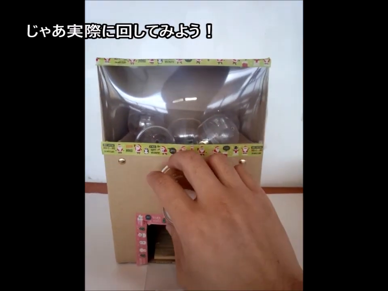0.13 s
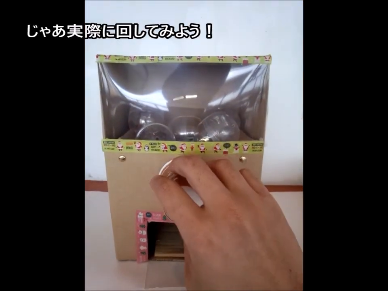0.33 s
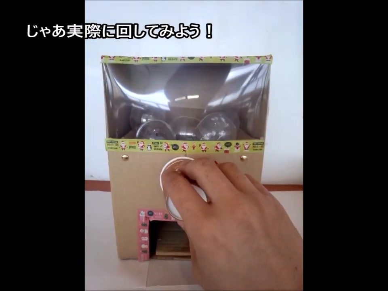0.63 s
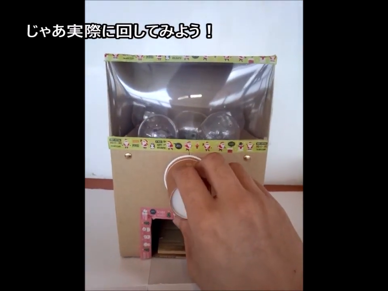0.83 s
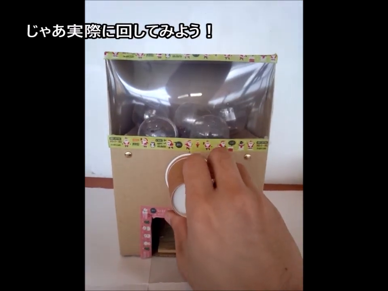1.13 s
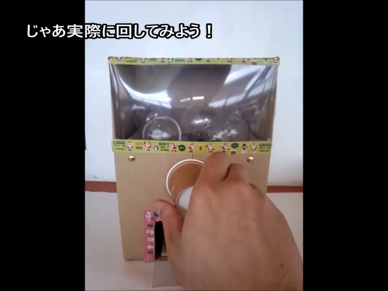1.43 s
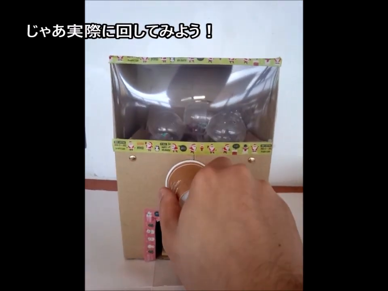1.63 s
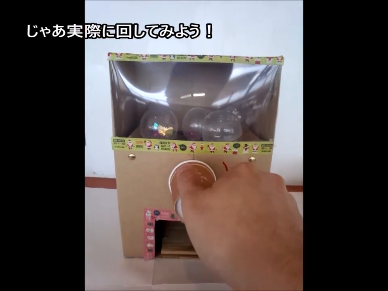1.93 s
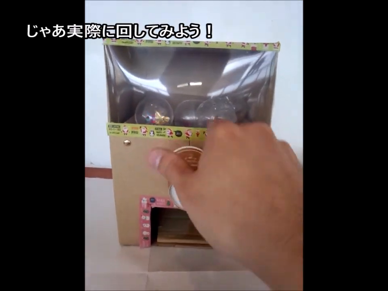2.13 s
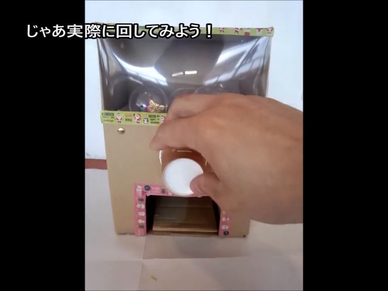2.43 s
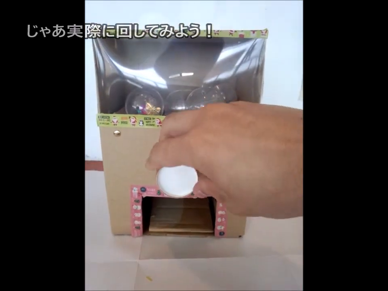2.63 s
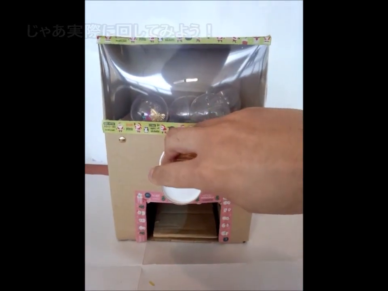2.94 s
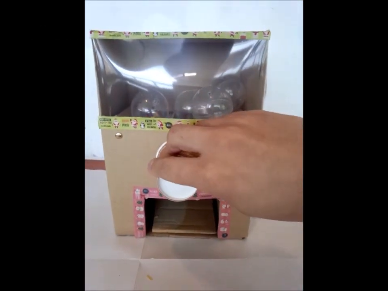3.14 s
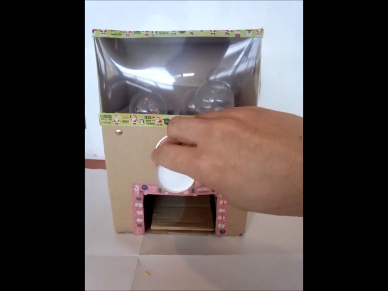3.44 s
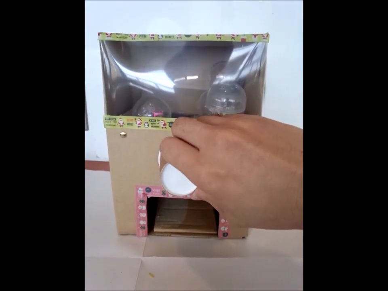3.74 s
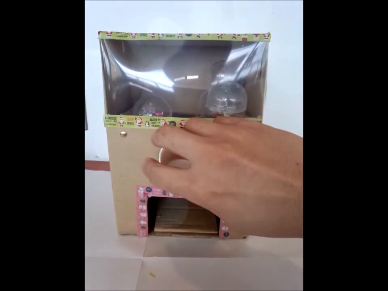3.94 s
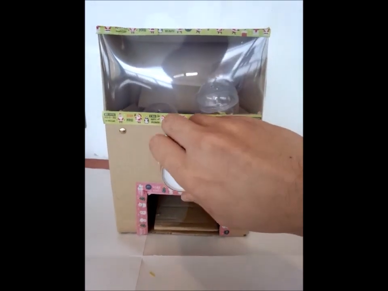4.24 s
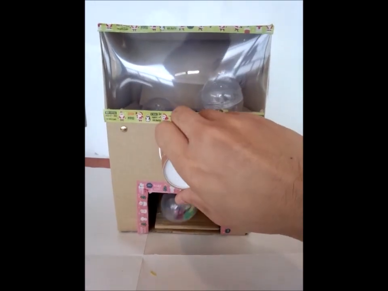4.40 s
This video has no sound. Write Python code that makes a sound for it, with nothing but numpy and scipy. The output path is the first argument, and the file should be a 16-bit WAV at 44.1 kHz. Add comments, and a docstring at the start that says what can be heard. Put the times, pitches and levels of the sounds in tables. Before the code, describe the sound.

Close phone recording in a small room. Over low rumble and soft hiss, a few light ticks and a dull knock lead into a dense burst of cardboard scraping and hollow capsule knocks around two seconds. It thins to near quiet, a light rattle of ticks follows, then another short scrape ends with a capsule dropping in a hard, bright plastic clack.

```python
"""In a small room, close to a phone, a hand turns the knob of a home-made cardboard capsule machine.
Stick-slip friction, modelled as random releases over hiss, makes the drum scrape and the capsules skid.
Impacts excite decaying modes: hollow plastic capsules knock on the cardboard walls and tick together.
At the end one capsule drops down the chute with a hard tick whose close modes beat as they fade.
A short tail of reflections and a low room tone surround the machine."""
import sys
import numpy as np
from scipy import signal
from scipy.fft import rfft, irfft
from scipy.io import wavfile

SR = 44100
rng = np.random.default_rng(int(sys.argv[2]) if len(sys.argv) > 2 else 0)


def output_pcm(signal):
    """Save a mono or channel-first signal as 16-bit PCM at the path in sys.argv[1].

    Samples are clipped to [-1, 1] before scaling.
    """
    pcm = np.clip(np.atleast_2d(signal).T, -1, 1) * 32767
    wavfile.write(sys.argv[1], SR, np.round(pcm).astype(np.int16))


N = 201492

# steady background spectrum of the room: [frequency_hz, level_db]
ROOM_SPECTRUM = [(15, -10), (40, -1), (65, -3), (110, -3), (170, -12), (300, -16), (480, -22), (630, -21),
                 (1000, -26), (1500, -26), (2450, -21), (3500, -29), (5500, -37), (7500, -41), (8300, -52)]
# spectrum of the reflected tail: [frequency_hz, level_db]
TAIL_SPECTRUM = [(100, -18), (400, -7.5), (900, -19), (1500, -8.5),
                 (2400, -8), (3400, -4.5), (4500, 0), (8000, -6)]
# pushes on the knob, by moment of most effort and time constant of the swell:
# [peak_s, swell_s, cardboard_rub_db, plastic_skid_db]
PUSHES = [(.8, 0.13, -55.5, -68), (1.499, .3, -47.5, -56.5), (1.83, .09, -37.5, -40), (2.02, .19, -37, -43),
          (2.36, .08, -63.5, -49), (2.901, 0.48, -63, -52), (3.69, .12, -44, -53), (3.9, .16, -54.5, -53.5),
          (4.269, .08, -41, -46), (4.52, .1, -44, -60)]
# friction spectrum of the drum on cardboard: [frequency_hz, level_db]
RUB_SPECTRUM = [(150, -16), (320, -3.5), (480, -9), (580, 1.5), (635, 4), (700, -1.5), (1000, -13),
                (1450, -7), (1850, -11.5), (2500, -5), (3300, -28.5), (5000, -37.5)]
# friction spectrum of capsule on capsule: [frequency_hz, level_db]
SKID_SPECTRUM = [(2000, 2), (3300, 13), (4000, 11), (4480, 2), (5000, 5.5), (5800, -3.5), (7200, 4),
                 (8200, -54)]
# low rumble of the rocking box: [frequency_hz, level_db]
ROCKING_SPECTRUM = [(25, -16), (55, -7.5), (120, -8), (220, -19), (600, -74)]
# hard plastic ticking on a shell, at the end the fallen capsule's clack and its beating ring:
# [start_s, level_db, top_end_db, dry_crack_db]
TICKS = [(1.1689, -31, -10.5, 7), (1.2116, -30.5, -25, 2), (1.4381, -31, -22, 4), (1.814, -31, -4.5, 0.5),
         (1.9669, -24.5, -13, -11), (2.025, -34, -6.5, 8), (2.3267, -23.5, -30, 5), (3.6567, -28, -28, -3),
         (3.693, -29, -26, -10), (3.7215, -32, -25, -12), (3.763, -29, -19, -4), (3.832, -31.5, -41, 17),
         (3.9494, -31.5, -17, 3), (4.0396, -31, -11.5, 14), (4.434, -20, -11, -2), (4.447, -8.5, -14.5, -6),
         (4.4511, -11.5, -12, 1), (4.4587, -19, -24, -3), (4.478, -23.5, -16, -13),
         (4.4899, -22.5, -11, -2), (4.4941, -17.5, -8, -13), (4.508, -34, -9, 4), (4.521, -31.5, 5.5, -10),
         (4.5439, -22.5, -8, 13)]
# modes of a capsule shell, before the contact envelope: [frequency_hz, level_db, t60_s]
SHELL_MODES = [(2786, -12, .04), (3250, -9, .05), (3800, -13, .05), (4032, -7, .1), (4410, 0, .16),
               (4475, -4, .12), (4553, -2, .12), (4623, -3, .1), (5113, -6, .1), (5358, -5, .14),
               (5520, -9, .06), (6610, -9, .05), (6850, -8, .06), (7100, -7, .05), (7680, -8, .04)]
# capsules knocking on the box, with the note of the wall and the hollow note:
# [start_s, level_db, brightness_db, hollowness_db, wall_hz, hollow_hz]
KNOCKS = [(0.76, -45, -8, 7, 362, 1430), (0.864, -38.5, 0.5, 7.5, 505, 1420),
          (1.152, -15.5, -4, 4, 640, 1316), (1.299, -35, -3, 8.5, 290, 1366),
          (1.471, -31, -4, 2, 617, 1456), (1.593, -31.5, -2.5, 1, 384, 1320),
          (1.655, -27.5, -6, 4.5, 640, 1526), (1.677, -17.5, -4.5, -3, 347, 1410),
          (1.757, -11.5, 1.5, 3, 306, 1292), (1.767, -13.5, 3, 0, 787, 1550),
          (1.791, -26, 0, 4.5, 284, 1480), (1.81, -19, 1, -2, 790, 1460),
          (1.823, -21.5, 0, -3.5, 305, 1490), (1.897, -34.5, 2.5, 11.5, 386, 1500),
          (1.934, -16.5, -2.5, 8.5, 555, 1474), (1.962, -20, -2.5, -6, 760, 1450),
          (1.976, -24, -4, 5, 594, 1514), (2.014, -21.5, -3, 0, 640, 1384), (2.061, -36, -1, 3, 297, 1530),
          (2.181, -21, 5.5, -7.5, 277, 1480), (2.183, -20.5, -0.5, 2.5, 337, 1215),
          (2.628, -44, 13.5, 5.5, 288, 1780), (2.683, -39.5, 8, -5, 295, 1580),
          (3.279, -34.5, -5, -4, 446, 1440), (4.209, -33, 3, 5.5, 672, 1490),
          (4.255, -30.5, -2.5, 4, 407, 1520), (4.277, -23.5, 0, 4, 760, 1670),
          (4.357, -41, 4, 8, 281, 1520), (4.371, -33.5, -3.5, 3.5, 270, 1446),
          (4.426, -23.5, -4, 1.5, 403, 1417), (4.44, -20, -5, -5, 490, 1605),
          (4.486, -33, -2.5, -5, 480, 1230), (4.53, -35, -2, 3, 590, 1430)]
# modes of the box with its capsules, before the contact envelope: [frequency_hz, level_db, t60_s]
BOX_MODES = [(179, -19.5, 0.15), (324.7, 3, 0.032), (457, 3, 0.026), (592, -5.5, 0.14), (700, -25.5, 0.038),
             (770, 0, 0.04), (1241, -2.5, 0.08), (1439, -2.5, 0.049), (1678, -2, 0.013),
             (2200, -17.5, 0.024), (2155, -6, 0.023), (2380, -7, 0.023), (2546, -5, 0.021),
             (2760, 3, 0.0096), (3404, -23.5, 0.14), (3810, -10, 0.027), (4980, -22, 0.025),
             (6150, -15.5, 0.026), (7300, -14.5, 0.022)]
# spectrum of the crunch of creased board: [frequency_hz, level_db]
CRUNCH_SPECTRUM = [(100, 15), (300, -3), (750, 14), (1020, -0.5), (1400, 18), (1850, -5.5), (2600, 1.5),
                   (3300, -11.5), (4800, -8.5), (8000, -26)]
# limits of the thud, hollow, clack and crack registers of a knock: [edge_hz]
REGISTER_EDGES_HZ = [90, 1000, 1900, 3250, 9000]

T = np.arange(N) / SR
RING_T = T[:SR // 6]  # time axis of every short sound
ROOM_DB, ROOM_T60_S = -41.5, 0.32
RELEASE_SHARE = 0.65  # a push dies away in this share of its swell time
# small knocks over the rub, small ticks over the skid, and the scatter of both
JOSTLE_DB, CHATTER_DB, STIR_SPREAD_DB = 3.5, 4, 1.5
NOTE_DB = 8.5  # strength of a knock's two notes over the other modes
CRACK_DB, CRACK_PER_BRIGHTNESS = -14, 0.11  # top register, and how far it follows the brightness
# how long a capsule presses on the board; this much more brightness halves it
CONTACT_S, CONTACT_HALVING_DB = 0.013, 8
TOP_HZ = 8050  # upper limit of the phone's input


def undb(db):
    """Level and amplitude: 20 dB is a factor of ten in gain."""
    return 10 ** (np.asarray(db) / 20)


def unit(x):
    """Mean power: scale to rms 1."""
    return x / np.sqrt(np.mean(x ** 2))


def blow(x):
    """Impact energy: scale a short sound to the energy of 5 ms at rms 1."""
    return x / np.sqrt(np.sum(x ** 2) / (SR / 200))


def fade(t60):
    """Exponential damping: a fall of 60 dB in t60 seconds."""
    return np.exp(-np.log(1000) * RING_T / max(t60, 1e-3))


def band(x, low_hz, high_hz):
    """Band limitation by a causal filter."""
    sos = signal.butter(N=3, Wn=[low_hz, high_hz], btype="band", fs=SR, output="sos")
    return signal.sosfilt(sos, x)


def colour(x, points):
    """Spectral shaping: weight the spectrum by a curve of (Hz, dB) points on a log-frequency axis."""
    hz, db = np.transpose(points)
    bins = np.maximum(np.fft.rfftfreq(len(x), 1 / SR), 1)
    curve_db = np.interp(np.log(bins), np.log(hz), db)
    return irfft(rfft(x) * undb(curve_db), len(x))


def walk(rate):
    """Random drift: straight lines join normal random values, rate of them per second."""
    knots = rng.standard_normal(int(N / SR * rate) + 2)
    return np.interp(T * rate, np.arange(len(knots)), knots)


def add(out, start, x):
    """Superposition: mix a short sound in at a time."""
    i = int(start * SR)
    out[i:i + len(x)] += x[:N - i]


def room_tone():
    """Stationary noise: soft hiss over a low rumble, drifting a little in level."""
    drift_db = 1.2 * walk(1.7)
    return undb(ROOM_DB + drift_db) * unit(colour(rng.standard_normal(N), ROOM_SPECTRUM))


def reflections(x, t60, wet_db):
    """Reverberation: the hopper and small room answer with a short tail of gradual onset."""
    tail = colour(rng.standard_normal(len(RING_T)), TAIL_SPECTRUM)
    tail *= fade(t60) * (1 - fade(0.032))
    tail /= np.sqrt(np.sum(tail ** 2))
    return undb(wet_db) * signal.fftconvolve(x, tail)[:N]


def effort():
    """Driving force: each push swells to its peak and dies away, setting the rub and skid gains."""
    board, plastic = 0, 0
    for peak_s, swell_s, board_db, plastic_db in PUSHES:
        distance_s = np.maximum(peak_s - T, (T - peak_s) / RELEASE_SHARE)
        push = np.exp(-distance_s / swell_s)
        board = board + undb(board_db) * push
        plastic = plastic + undb(plastic_db) * push
    return board, plastic


def slips(rate, spread_db, hiss):
    """Stick-slip friction: many small releases of uneven size over a smooth hiss."""
    size_db = spread_db * np.minimum(rng.exponential(size=N), 4)
    sizes = undb(size_db) * rng.standard_normal(N)
    releases = sizes * (rng.random(N) < rate / SR)  # rate is the mean number per second
    return unit(unit(releases) + hiss * rng.standard_normal(N))


def drum(rub, skid):
    """Sliding friction: drum on cardboard and capsule on capsule share an uneven grip; the box rocks."""
    board = unit(colour(slips(rate=1200, spread_db=-3, hiss=1), RUB_SPECTRUM))
    plastic = unit(colour(slips(rate=1600, spread_db=0.5, hiss=0.87), SKID_SPECTRUM))
    rocking = unit(colour(rng.standard_normal(N), ROCKING_SPECTRUM))
    grip = undb(3.6 * walk(90))
    return (grip * board + rocking) * rub + grip * plastic * skid


def stirred(gain, crowding, count):
    """Random contacts (s, gain): they strengthen with the effort and crowd where it is greatest."""
    density = gain ** crowding
    share = (np.arange(count) + rng.random(count)) / count
    times = np.interp(share, np.cumsum(density) / np.sum(density), T)
    scatter = undb(STIR_SPREAD_DB * rng.standard_normal(count))
    return zip(times, np.interp(times, T, gain) * scatter)


def ring(modes, detune, scatter_db, flipped):
    """Modal synthesis: each contact point reweights and detunes the modes and puts some in antiphase."""
    chance = rng.standard_normal((len(modes), 2))
    signs = np.where(rng.random(len(modes)) < flipped, -1, 1)
    total = np.zeros(len(RING_T))
    for (hz, db, t60), (weight, shift), sign in zip(modes, chance, signs):
        wave = np.sin(2 * np.pi * hz * (1 + detune * shift) * RING_T)
        total += sign * undb(db + scatter_db * weight) * fade(t60) * wave
    return total


def tick(top_db, crack_db):
    """Hard impact: close modes of a thin shell start together in a short chink, then beat as they fade."""
    chink = (1 - fade(0.007)) ** 2 * (fade(0.02) + undb(-26))
    crack = band(rng.standard_normal(len(RING_T)) * fade(0.22), 2460, 5940)
    shell = ring(SHELL_MODES, detune=0.00025, scatter_db=2, flipped=0)
    sound = blow(shell * chink) + undb(crack_db) * blow(crack * chink)
    # harder contacts reach the top modes more
    body, top = band(sound, 2300, 5700), band(sound, 6400, 8500)
    return undb(-5) * blow(body) + undb(top_db) * blow(top)


def ticks(skid):
    """Impacts of plastic on plastic: clear ticks on the shells, faint chatter while the capsules skid."""
    out = np.zeros(N)
    for start, db, top_db, crack_db in TICKS:
        add(out, start, undb(db) * tick(top_db, crack_db))
    for start, gain in stirred(skid, crowding=1.9, count=32):
        add(out, start, gain * undb(CHATTER_DB) * tick(top_db=-11, crack_db=2))
    return out


def knock(bright_db, hollow_db, wall_hz, hollow_hz):
    """Soft impact: a capsule presses briefly on a wall; the box rings and the creased board crunches."""
    notes = ring([(wall_hz, 0, 0.04), (hollow_hz, 0, 0.04)], detune=0.001, scatter_db=0, flipped=0)
    modes = ring(BOX_MODES, detune=0.003, scatter_db=3.5, flipped=0.5) + undb(NOTE_DB) * notes
    crunch = colour(rng.standard_normal(len(RING_T)), CRUNCH_SPECTRUM)
    crunch *= fade(0.052) + undb(-8) * fade(0.1)
    # the soft board yields gradually; once the contact ends the capsule settles on it and damps it
    contact_s = CONTACT_S * 2 ** (-bright_db / CONTACT_HALVING_DB)
    press = (1 - fade(0.0054)) ** 2 * (undb(-6.5) + np.exp(-(RING_T / contact_s) ** 2))
    sound = (blow(modes) + undb(-7) * blow(crunch)) * press
    # thud, hollow, clack and crack: a bright knock trades thud for clack and crack
    register_db = [-bright_db, hollow_db, bright_db, CRACK_DB + CRACK_PER_BRIGHTNESS * bright_db]
    registers = zip(register_db, REGISTER_EDGES_HZ, REGISTER_EDGES_HZ[1:])
    return sum(undb(db) * blow(band(sound, low, high)) for db, low, high in registers)


def knocks(rub):
    """Impacts on a panel: clear blows on the cardboard, and light jostling while the drum moves."""
    out = np.zeros(N)
    for start, db, *contact in KNOCKS:
        add(out, start, undb(db) * knock(*contact))
    for start, gain in stirred(rub, crowding=2, count=18):
        jostle = knock(bright_db=-0.5, hollow_db=1, wall_hz=rng.uniform(280, 760), hollow_hz=1450)
        add(out, start, gain * undb(JOSTLE_DB) * jostle)
    return out


def scene():
    """Superposition of the room, the machine and its reflections."""
    rub, skid = effort()
    machine = drum(rub, skid) + ticks(skid) + knocks(rub)
    reflected = reflections(machine, t60=ROOM_T60_S, wet_db=-9.5)
    return (machine + reflected + room_tone())[None]


def record(dry):
    """Saturation: the phone's input has a steady offset, flattens the loudest knocks and cuts the top."""
    x, ceiling = dry - 0.13, 0.56
    rounded = x / (1 + (x / ceiling) ** 8) ** (1 / 8)
    low_pass = signal.ellip(10, 0.2, 85, TOP_HZ, fs=SR, output="sos")
    return signal.sosfilt(low_pass, rounded)


dry = scene()
out = record(dry)
output_pcm(out)
```